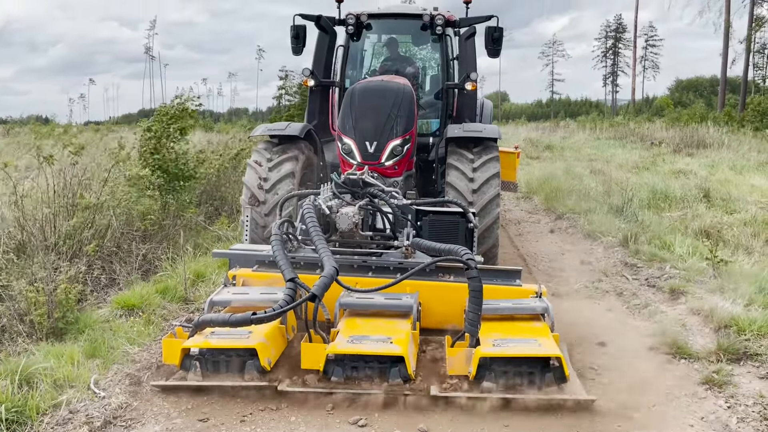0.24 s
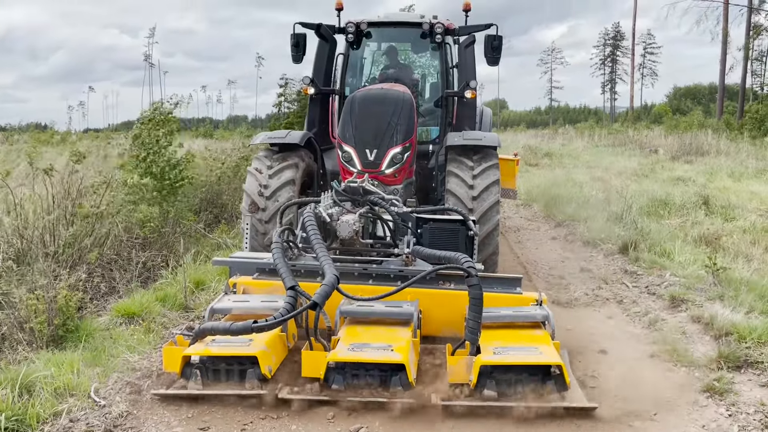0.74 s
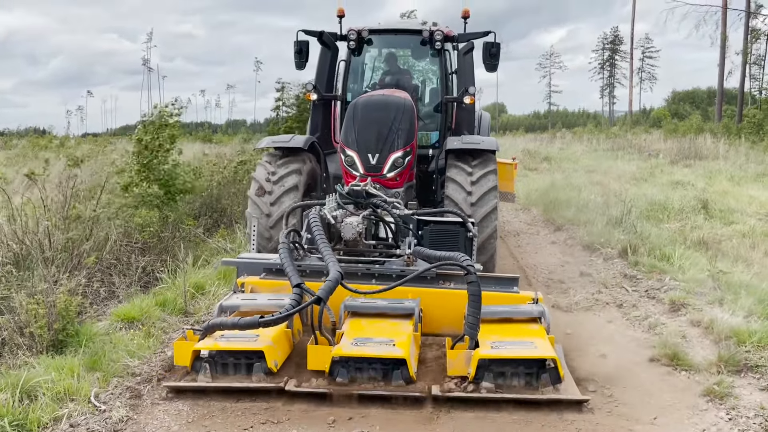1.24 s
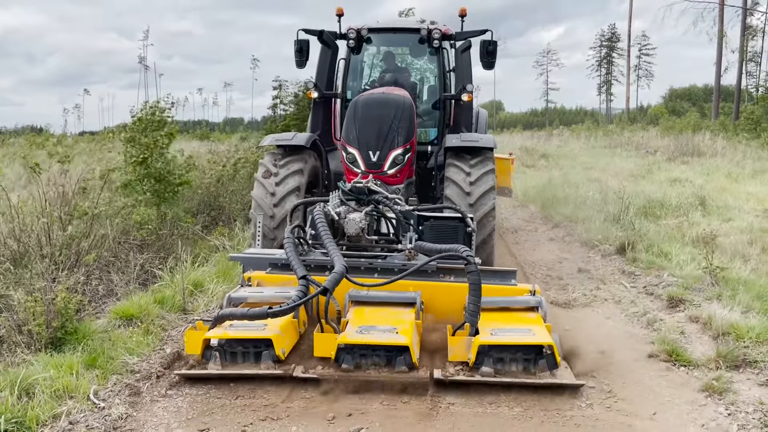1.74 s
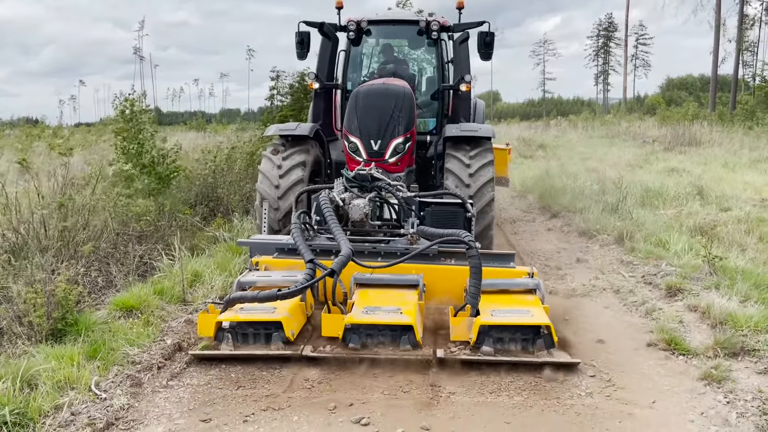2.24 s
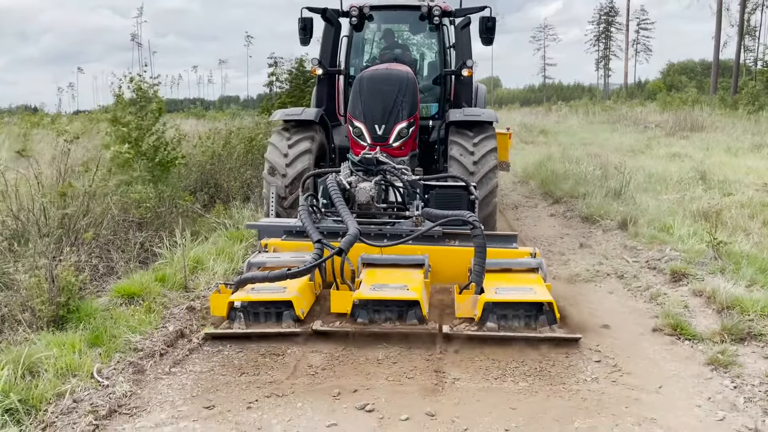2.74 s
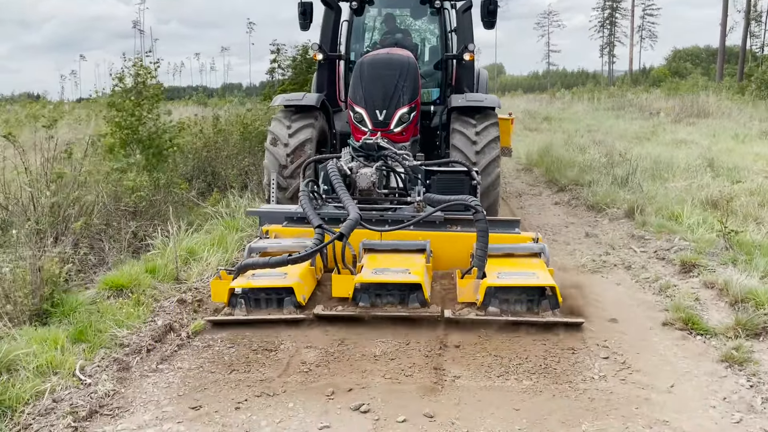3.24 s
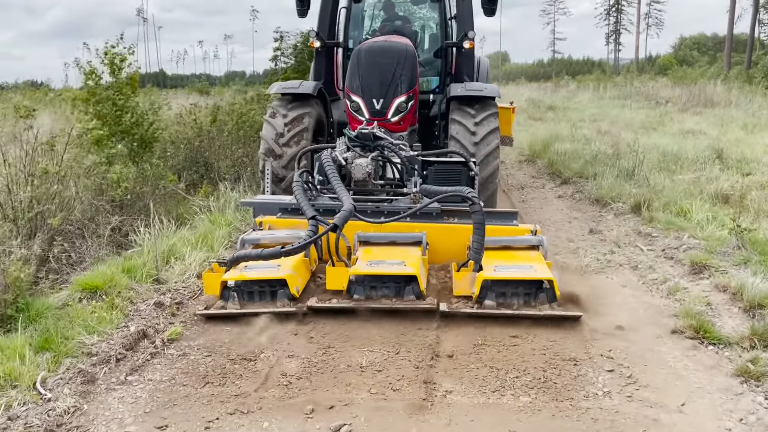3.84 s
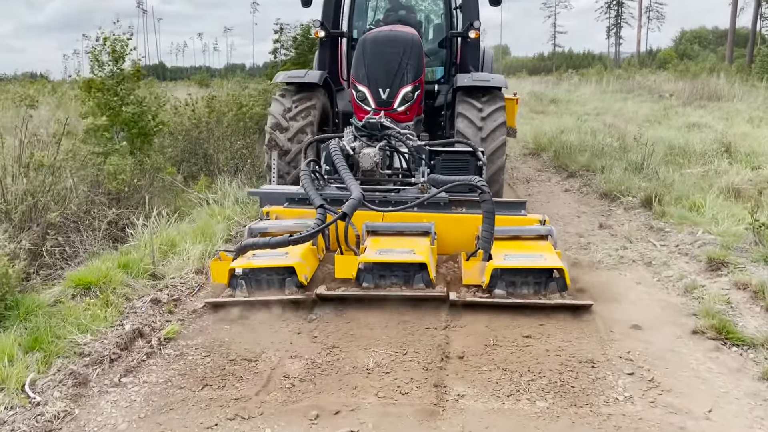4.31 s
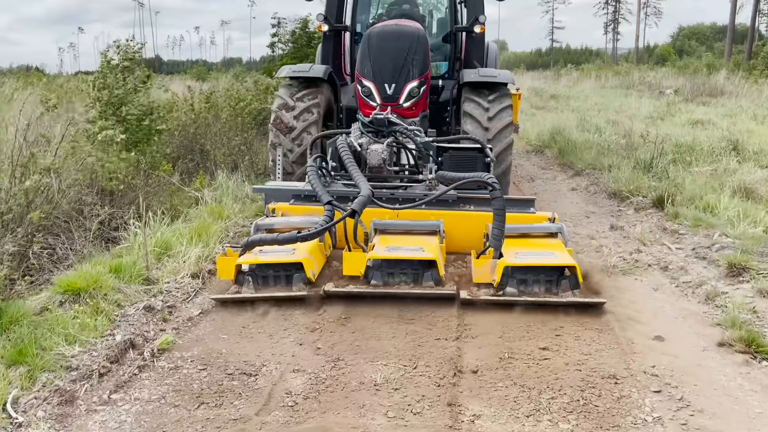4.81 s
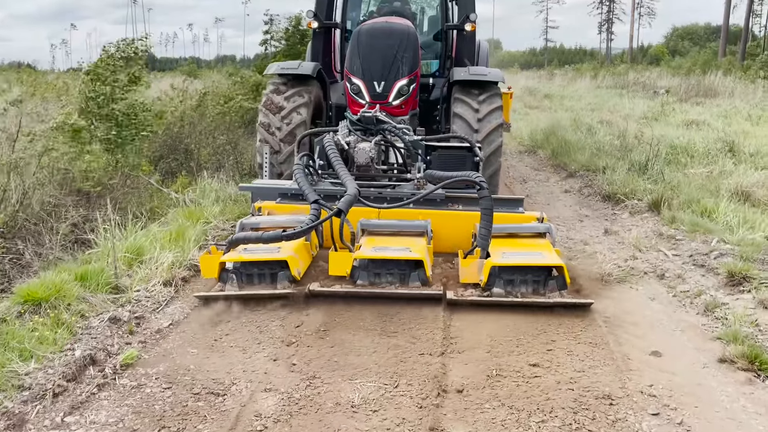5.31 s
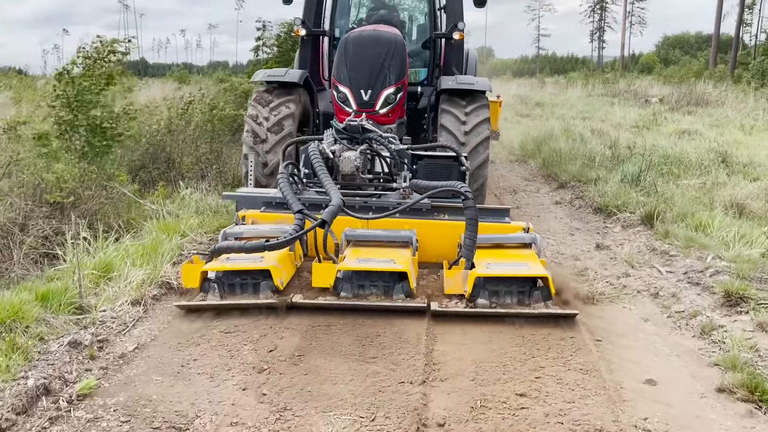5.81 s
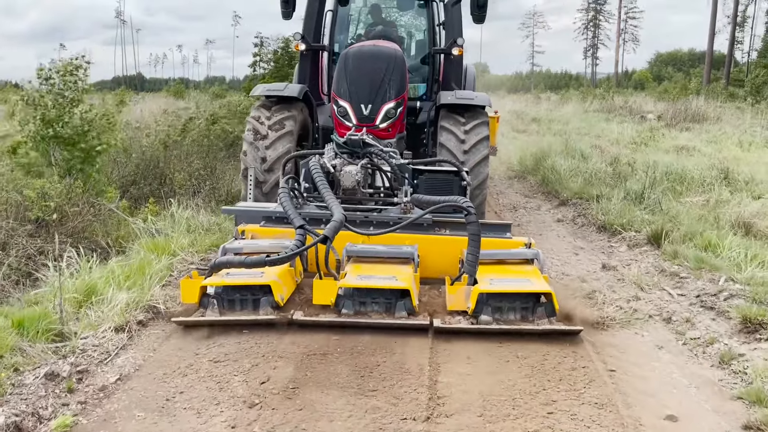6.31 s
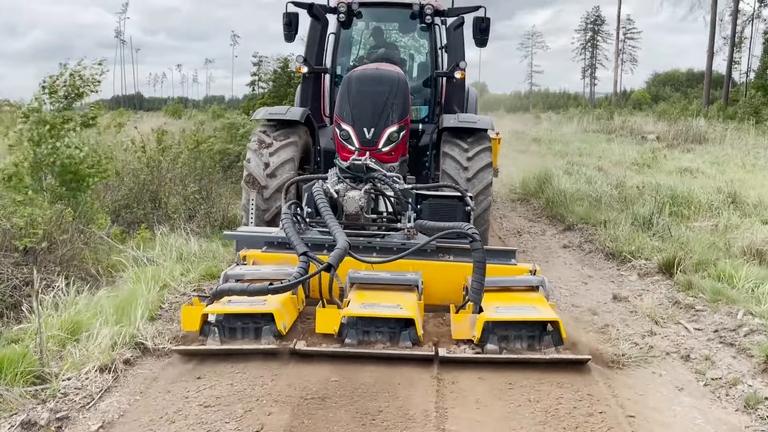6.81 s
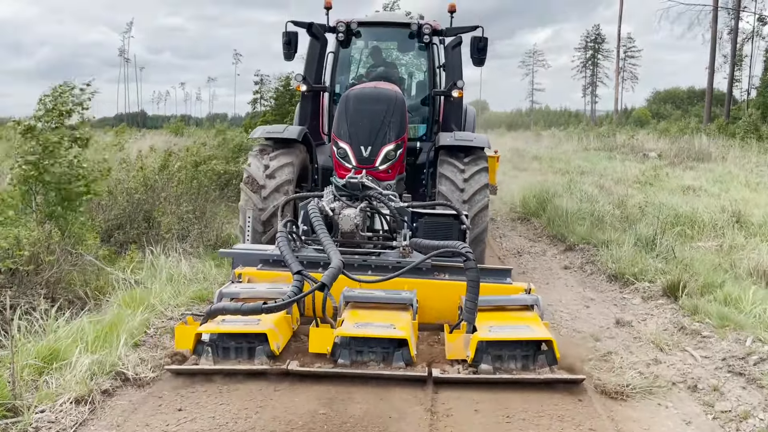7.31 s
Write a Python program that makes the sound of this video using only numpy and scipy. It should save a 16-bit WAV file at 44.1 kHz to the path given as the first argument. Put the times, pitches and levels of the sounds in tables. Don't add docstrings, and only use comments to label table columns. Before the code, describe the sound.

For about 7.5 seconds, a tractor's vibrating plates shake on gravel outdoors, heard from a few metres on a handheld phone. A deep hum around 48 Hz beats as the plate groups drift in and out of step, swelling near 1.5, 3, and 7 seconds and thinning around 3.5 and 5.6. Steel roars and stones chatter rapidly with each turn. From 0 to 1 second it is roughest: sprays of stones, scrapes, knocks, and ringing clanks. Faint high squeaks come at 1.1 to 1.8 and 2.8. At 3.65 a hard stone blow cracks, with a flurry of wind pops and short chirps until 4. A low thud lands at 5.2, a dull knock at 6, light knocks near 7. Wavering pump, motor and gear whines persist, a faint whistle joining around 6.7 to 7.3. Wind rumbles, flutters and thumps unevenly throughout, easing briefly near 4 and 5.5.

```python
import sys
import numpy as np
from scipy import signal
from scipy.fft import rfft, irfft, next_fast_len
from scipy.io import wavfile
from scipy.ndimage import uniform_filter1d

SR = 44100
rng = np.random.default_rng(int(sys.argv[2]) if len(sys.argv) > 2 else 0)


def transcribe(u):
    v = np.clip(np.atleast_2d(u).T, -1, 1)
    q = np.round(v * 32767).astype(np.int16)
    wavfile.write(sys.argv[1], SR, q)


def volts_from_db(level):
    exponent = np.asarray(level, float) / 20
    return 10 ** exponent


N = 333043
T = np.arange(N) / SR

SHAFT_HZ, MOTOR_HZ = 47.58, 261.0

# t/s, force/dB, lag/deg
BEAT = [(0, -17, 200), (.55, -5.5, 150), (.95, -5.5, 124), (1.38, -3, 52), (1.7, 0, 133), (2.15, -2, 204),
        (2.45, -10, 135), (2.95, 0.5, 154), (3.25, 2.5, 150), (3.55, -16.5, 170), (4.15, -3.5, 177),
        (4.58, -10, 200), (4.72, -9.5, 227), (5.08, -4, 170), (5.6, -25, 110), (6.52, -0.5, 85),
        (7.05, 1.5, 104), (7.4, -5, 36)]
# multiple, level/dB
IN_STEP_ORDERS = [(1, -10.5), (2, -10.5), (3, -18)]
# multiple, level/dB
UPPER_ORDERS = [(2.5, -35.5), (3.5, -42), (4, -36), (5, -36.5), (7, -45.5), (8, -52), (13, -44.5)]
# multiple, level over the rocking/dB
ROCKING_ORDERS = [(6, -0.5), (11, -8.5)]
# t/s, level/dB
ROCKING_DB = [(0, -26.5), (.7, -21), (1.5, -29), (2.0, -25), (2.5, -37), (4.5, -58), (5.0, -29), (5.4, -43),
              (5.7, -25), (6.3, -35), (7.1, -24.5), (7.55, -29)]

# t/s, level/dB
BITE_DB = [(0, 6.5), (.55, 3), (.8, -0.5), (1, -0.5), (1.83, -1.5), (2.6, -2.5), (3.3, 0), (3.85, 1.5),
           (4.04, -1.5), (5.05, 1), (5.42, -0.5), (6.25, 1.5), (7.17, 1.5), (7.55, 0.5)]
# f/Hz, level/dB
ROAR_SPECTRUM = [(60, -21), (150, -2), (300, 3), (500, 2.5), (800, -2.5), (1000, -10.5), (1600, -9),
                 (2200, -14), (4000, -22.5), (8000, -40.5)]
# f/Hz, level/dB
CHATTER_SPECTRUM = [(300, -79), (1000, 2.5), (2100, 1), (3200, -6), (4700, -9), (6300, -11.5), (8000, -15),
                    (10000, -19), (13000, -30), (16000, -28)]
# f/Hz, width/Hz, lift/dB
FRAME_RINGS = [(275, 54, 3), (367, 215, -8), (769, 11, 5), (1290, 300, 2), (1391, 66, -6),
               (1550, 200, -0.5), (1870, 480, -1.5), (2074, 80, 3), (2450, 130, -2.5), (3174, 31, 4),
               (4650, 77, 2.5)]
# t/s, level over the chatter/dB, t60/s
SPATTERS = [(.205, -19, 0.075), (.325, 1.5, 0.19), (.37, -7, 0.092), (.438, 5, 0.12), (0.549, -1, 0.19),
            (0.629, 4.5, 0.13), (.825, 4, 0.03), (.083, 0, 0.046), (.168, -13, .04), (.253, -12, 0.035),
            (.417, -7, .04), (.507, 0, .04), (.74, -6, .03), (.783, -3, .03), (.866, -6, .03),
            (.912, -11, .03), (0.932, -3, .03), (1.19, 3, 0.033), (2.962, -6, 0.032), (3.323, -16, 0.028),
            (3.341, -13, 0.028), (4.763, -8, 0.028), (5.311, -2, .03), (5.456, -7, 0.036), (5.562, -6, .03),
            (7.339, 2, .03), (7.487, -3, .03), (2.69, -16, 0.044), (3.9, -7, .08), (6.12, -19, .05),
            (6.855, -15, 0.047)]
# t/s, peak/dB, f/Hz
KNOCKS = [(0.014, -11, 1030), (0.065, -11, 563), (0.211, -8, 665), (0.292, -9, 848), (0.326, -14, 660),
          (0.446, -14, 1030), (0.57, -10, 830), (0.591, -13, 1040), (0.63, -10, 900), (0.748, -9, 573),
          (0.761, -5, 589), (0.792, -9, 570), (0.846, -15, 738), (0.869, -21, 686), (1.622, -16, 770),
          (1.954, -18, 776), (2.152, -16, 735), (2.313, -14, 744), (2.378, -15, 689), (2.692, -16, 589),
          (2.747, -17, 789), (2.778, -18, 757), (2.915, -18, 794), (3.053, -21, 680), (3.645, -5, 604),
          (4.579, -13, 791), (4.656, -15, 587), (4.81, -15, 689), (4.842, -17, 670), (6.006, -19, 627),
          (6.063, -20, 665), (6.169, -22, 721), (6.482, -18, 762), (6.856, -16, 738), (7.008, -13, 611),
          (7.046, -16, 794), (7.111, -13, 600),
          (3.659, -2, 740),
    (3.681, -13, 1050),
    (3.7085, -10, 1100),
    (5.1795, -6, 580),
    (5.981, -8, 680),
    (3.574, -8, 640),
    (.584, -16, 880),
    (.376, -13, 870),
]

# t/s, f/Hz
PUMP_HZ = [(0, 412), (7.55, 412)]
# multiple, level/dB
PUMP_ORDERS = [(2.5, -43), (3, -46), (4, -44.5), (10, -60)]
# t/s, level/dB
PUMP_FIFTH_DB = [(0, -45), (.4, -38), (.82, -51), (3.5, -47), (3.76, -37), (4.2, -46), (4.7, -52),
                 (5.1, -44), (5.3, -42), (6.3, -49), (6.62, -49), (7.32, -38), (7.55, -46)]
# t/s, f/Hz
FAN_HZ = [(0, 424), (2.5, 420), (4.5, 412), (7.55, 408)]
# multiple, level/dB
FAN_ORDERS = [(1, -38.5)]
# multiple, level/dB
MOTOR_ORDERS = [(1, -37), (3, -38.5)]
# multiple, level/dB
MOTOR_CLEAN_ORDERS = [(11, -52.5)]
# t/s, level/dB
MOTOR_SIXTH_DB = [(0, -55), (.53, -30), (.7, -43.5), (2.5, -55), (2.8, -40.5), (7.55, -43)]
# t/s, level/dB
MOTOR_TWELFTH_DB = [(0, -59), (1.2, -47), (2, -49), (2.7, -44), (3.3, -51), (4.1, -45), (5.2, -52),
                    (6, -47.5), (7.55, -56)]
# t/s, f/Hz
GEAR_HZ = [(0, 2130), (2.4, 2128), (2.8, 2146), (7.55, 2142)]
# t/s, level/dB
GEAR_DB = [(1.6, -70.5), (2, -43), (3, -41.5), (7.55, -44.5)]
# t/s, f/Hz
VALVE_HZ = [(0, 2470), (.6, 2478), (.9, 2450), (1.3, 2490), (2, 2460), (3, 2478), (7.55, 2470)]
# t/s, level/dB
VALVE_DB = [(0, -39), (.6, -40), (.8, -45), (1.3, -39), (1.7, -50), (3.8, -48), (4, -42), (4.6, -44),
            (4.8, -58), (5.1, -45), (6.2, -46), (6.5, -43), (7, -51)]
# t/s, f/Hz
HOSE_HZ = [(0, 2680), (7.55, 2680)]
# t/s, level/dB
HOSE_DB = [(6.5, -70), (6.7, -41), (7.25, -42), (7.4, -70)]

# t/s, peak/dB, f/Hz, t60/s
CLANKS = [(.012, -12.5, 1013, 0.078), (.255, -38, 3180, .08), (.37, -21, 1466, 0.11),
          (.41, -18.5, 1687, 0.13), (.414, -15.5, 3325, 0.066), (0.7, -14, 387.6, 1), (.2, -6, 394, 0.21),
          (.75, -20, 600, 0.48), (1.11, -21.5, 514, 0.62), (0.58, -25, 540, .3), (.8, -18, 465, 0.24)]
# t/s, level/dB rms, f/Hz, length/s
SQUEAKS = [(1.14, -40.5, 4500, 0.23), (1.33, -44, 4560, 0.14), (1.438, -41, 4540, 0.36),
           (2.802, -42, 4560, 0.24), (3.59, -42, 4540, 0.062), (3.675, -35, 4650, 0.04),
           (3.711, -28.5, 4650, 0.039), (3.757, -30, 4650, 0.032), (3.803, -31, 4650, .025),
           (3.846, -36, 4700, 0.023), (3.893, -49, 4550, 0.0201), (3.926, -32, 4650, 0.023),
           (3.96, -32, 4650, 0.021), (4.057, -37, 4605, .015)]
# t/s, level/dB rms, f/Hz, length/s
SCRAPES = [(.295, -30, 2060, .04), (.32, -28, 2070, .02), (.335, -29, 2370, .06), (.442, -26, 2400, .025),
           (.43, -30, 2540, .02), (.505, -26, 2030, .075), (.53, -31, 2450, .07), (.625, -34, 3220, .02),
           (.62, -27, 2060, .055), (.87, -30, 2270, .045), (.92, -31, 2200, .04), (.945, -31, 2330, .04)]

# t/s, strength/dB, flutter at the port edge over it/dB
WIND = [(0, -30.5, 20.5), (.1, -22, 8.5), (.35, -31.5, 22), (.6, -21.5, 9.5), (.9, -17.5, 2),
        (1.1, -21.5, 0), (2.1, -21, 3.5), (2.45, -28.5, 5.5), (2.8, -19.5, 2), (3.5, -17, -7.5),
        (3.8, -20, -2), (3.95, -32, -3), (4.5, -24, -2.5), (5.1, -20, -2.5), (5.5, -33, 1),
        (6.2, -21.5, -12.5), (6.6, -20.5, -4), (7.55, -15, -13)]
# t/s, deep lift/dB, flutter lift/dB
GUSTS = [(.67, 0, 4.5), (.74, -4, 1.5), (.5, -2, -4), (.81, -7, 0.5), (.88, 2, 3), (.94, 2, 2),
         (1.05, 3, -1), (1.15, 1, 1.5), (1.22, 2.5, 6.5), (1.3, -2, 3.5), (1.45, 3, -1.5), (1.6, 2, 2),
         (1.75, -4, -5), (1.95, 1, -3), (2.08, 2, -2.5), (2.21, 7.5, 1), (2.6, -1, 1), (2.68, -1, -6),
         (2.78, 4, -3), (2.9, -10, -1), (3.05, 2.5, -8), (3.2, -7, 2), (3.36, -1, -1), (3.46, -2, 9.5),
         (3.59, 4.5, 3), (3.65, 2, 7), (3.71, 4.5, 8), (3.79, -2, 4), (3.85, 3, 5), (4.08, 11.5, 1),
         (4.66, 0.5, 3.5), (4.76, -6, 7), (4.9, -10, 4), (5.17, -1, 9), (5.78, 1, 8), (6.04, 0.5, 14),
         (6.14, 0, -5), (6.3, 0, 6), (6.38, 1, -8), (6.471, 0, 8), (6.58, -3, 6.5), (6.72, -1, 5),
         (7.0, -0.5, 0), (7.25, -10, 11.5), (7.4, -3, 11)]
# f/Hz, level/dB
BUFFET_SPECTRUM = [(15, -34), (30, -15), (45, 3.5), (70, 10.5), (110, 2), (160, -4), (250, -22.5),
                   (500, -67)]
# f/Hz, level/dB
FLUTTER_SPECTRUM = [(60, -37), (120, -4), (180, 4), (300, -3.5), (450, -10.5), (900, -11), (1500, -55)]
# t/s, peak/dB, pan/dB, starting pitch above the resting one/Hz
POPS = [(0.12, -18, 8, 620), (0.162, -9, 1, 400), (2.359, -15, 0, 624), (2.692, -13, 4, 910),
        (2.756, -14, 2, 497), (3.515, -26, -0.5, 620), (3.573, -3, 6, 570), (3.64, -19, 2, 620),
        (3.65, -9, -8, 450), (3.664, -20, 10, 200), (3.674, -10, -9, 495), (3.682, -10.5, 14, 1110),
        (3.695, -5, -2, 300), (3.717, -15, 0, 600), (3.745, -17, 0, 300), (3.76, -23, 0, 695),
        (3.708, -13.5, 10, 1500), (3.729, -9, 6, 504), (4.095, -14, 4, 496), (4.8, -13.5, 6, 620),
        (5.174, -10, -3, 120), (5.18, -8, 8, 250), (5.195, -17, 0, 400), (5.236, -17, 0, 400),
        (5.387, -20, 0, 300), (5.983, -17, 0, 300), (6.051, -15, -4, 490), (6.08, -15, 2, 397),
        (6.458, -14, -9, 400), (6.522, -24, -3, 620)]
# t/s, peak/dB, f/Hz
THUMPS = [(.017, -16, 183), (0.208, -13, 97), (.24, -9, 180), (0.3, -6, 182), (.495, -2, 98),
          (.669, -4, 144), (1.03, -1, 81.4), (1.117, -4.5, 108), (1.195, -10, 62.4), (2.26, -9, 120),
          (2.476, -6.5, 91.5), (2.694, -8, 100), (2.753, -2, 125), (2.86, -5, 100), (2.966, -9, 91.5),
          (3.42, -7, 190), (3.471, -10, 190), (3.554, -6, 150), (3.683, -3, 125), (3.645, -6, 100),
          (3.71, -1, 91), (3.74, -8, 90), (3.802, -1, 93), (4.014, -14, 91.5), (4.265, -7.5, 91.5),
          (4.481, -14, 87), (4.89, -6, 88), (5.017, -8, 89), (5.776, -15, 75), (6.002, -7, 147),
          (6.429, -7, 74), (6.575, -6, 230), (6.63, -8.5, 144), (6.818, -10, 81), (7.25, -12, 190),
          (7.475, -5, 100)]

# f/Hz, left lead/rad
PORT_LEAD = [(0, 0), (1460, -.1), (2500, .6), (3960, .2), (5250, .6), (6890, -1.3), (7670, -3),
             (8870, -3.3), (10200, -5.1), (11500, -6.3), (12500, -7.4), (14000, -9.4), (16000, -9.4)]
# f/Hz, left minus right/dB
PORT_TILT = [(60, -0.5), (110, 1), (200, 1.5), (370, 0), (670, 2), (1220, -3.5), (2220, -0.5), (4060, 5),
             (7420, 1.5), (13500, -0.5)]
# f/Hz, correlation/1
PORT_LIKENESS = [(60, 0.84), (130, 0.43), (280, 0.12), (610, 0.78), (1330, 0.78), (2880, 0.69),
                 (6240, 0.95), (13500, 0.2)]
# 0 mid or 1 side, from f/Hz, to f/Hz, edge step/Hz, share of frames stepped/1
STARVED_BANDS = [
    (0, 7650, 8950, 350, .14),
    (0, 13780, 22050, 350, .12),
    (1, 10350, 12400, 600, .14),
    (1, 12400, 12900, 500, .65),
]
FULL_FRAMES_S = [.575, 2.23, 3.715, 6.125]


def evened(x):
    return x / np.sqrt(np.mean(x ** 2) + 1e-20)


def read(points, hz):
    f, value = np.transpose(points)
    return np.interp(np.log(hz + 1), np.log(f + 1), value)


def curves(rows):
    s, *columns = np.transpose(rows)
    return [np.interp(T, s, c) for c in columns]


def add(mix, s, sound):
    part = mix[..., round(s * SR):][..., :sound.shape[-1]]
    part += sound[..., :part.shape[-1]]


def coloured(x, points, rings=()):
    size = next_fast_len(N)
    hz = np.fft.rfftfreq(size, 1 / SR)
    db = read(points, hz)
    for f, width_hz, lift_db in rings:
        db = db + lift_db / (1 + (2 * (hz - f) / width_hz) ** 2)
    return evened(irfft(rfft(x, size) * volts_from_db(db), size)[..., :N])


def drift(rate_hz, through=np.asarray, depth=1):
    t = T[::256]
    rates_hz = rate_hz * np.geomspace(.08, 1, 12)
    slow = sum(np.sin(2 * np.pi * (f * t + rng.random())) / f ** 0.31 for f in rates_hz)
    return np.interp(T, t, through(depth * evened(slow)))


def tones(hz, orders, waver_db, rate_hz, fuzz_rad):
    half_turn = np.pi * np.cumsum(hz) / SR
    out = np.zeros(N)
    for k, db in orders:
        level = np.sqrt(2) * volts_from_db(db) * drift(rate_hz, volts_from_db, waver_db)
        phase = drift(rate_hz, depth=fuzz_rad) + 6 * rng.random()
        out += level * np.cos(round(2 * k) * half_turn + phase)
    return out


def plates():
    left_over = 0.16
    second_slam_db = 1.5
    force_db, lag_deg = curves(BEAT)
    lag = np.radians(lag_deg)
    hz = np.full(N, SHAFT_HZ)
    low = [(k, db + force_db + 10 * np.log10(np.cos(k * lag / 2) ** 2 + left_over ** 2))
           for k, db in IN_STEP_ORDERS]
    rocking_db = curves(ROCKING_DB)[0]
    rocking = [(k, db + rocking_db) for k, db in ROCKING_ORDERS]
    slam = volts_from_db(second_slam_db * np.cos(np.pi * SHAFT_HZ * T + 2 * lag))
    out = tones(hz, low, 1.6, 24, 0.3) * slam
    out += tones(hz, rocking, 2.6, 11, 1.23)
    return out + tones(hz, UPPER_ORDERS, 5.2, 4, 1.0)


def spatter():
    gain, t = np.ones(N), T[:SR // 4]
    for s, db, t60 in SPATTERS:
        add(gain, s, volts_from_db(db - 60 * t / t60))
    return gain


def shaking():
    roar_db, chatter_db, chatter_share = -25, -30, 0.53
    bite_db = curves(BITE_DB)[0]
    turn = 2 * np.pi * SHAFT_HZ * T + 1.2 * drift(1.5)
    slam_db = 1.3 * np.cos(turn) + 0.59 * np.cos(turn / 2) + 0.64 * np.cos(2 * turn + 0.93)
    slam_db += 0.32 * drift(14)
    size = volts_from_db(3.4 * np.minimum(rng.exponential(1, (2, N)), 5))
    hit = rng.random((2, N)) < 1500 * volts_from_db(2.5 * slam_db) / SR
    stones = 0.37 * evened(size * hit * rng.choice([-1, 1], (2, N)))
    stones += rng.standard_normal((2, N)) * volts_from_db(slam_db)
    roar = rng.standard_normal((2, N)) * volts_from_db(0.13 * slam_db + 1.3 * drift(20))
    roar = volts_from_db(roar_db + bite_db) * coloured(roar, ROAR_SPECTRUM, FRAME_RINGS)
    chatter = coloured(stones, CHATTER_SPECTRUM, FRAME_RINGS)
    return roar + volts_from_db(chatter_db + chatter_share * bite_db) * spatter() * chatter


def knocks():
    level_db, t60_s, bend, upper_db = -4, 0.036, 0.51, -8.5
    out, t = np.zeros(N), T[:1500]
    for s, db, hz in KNOCKS:
        turn = 2 * np.pi * np.cumsum(hz * (1 + bend * np.exp(-t / 0.0017))) / SR
        ring = np.sin(turn) + volts_from_db(upper_db) * np.sin(1.7 * turn)
        add(out, s, volts_from_db(db + level_db - 60 * t / t60_s) * ring * np.minimum(t / .0008, 1))
    return out


def whines():
    throb_hz, throb_peak_s, throb_db = 1.623, 3.88, 5.5
    throb = throb_db * np.cos(2 * np.pi * throb_hz * (T - throb_peak_s))
    sixth = [(6, curves(MOTOR_SIXTH_DB)[0] + throb)]
    twelfth = [(12, *curves(MOTOR_TWELFTH_DB))]
    fifth = [(5, *curves(PUMP_FIFTH_DB))]
    motor_hz = np.full(N, MOTOR_HZ)
    out = tones(motor_hz, sixth, 2.8, 30, 1.1)
    out += tones(motor_hz, MOTOR_ORDERS, 2.7, 20, 1.17)
    out += tones(motor_hz, twelfth + MOTOR_CLEAN_ORDERS, 2.6, 16, .9)
    out += tones(*curves(PUMP_HZ), PUMP_ORDERS + fifth, 2.8, 14, 0.75)
    out += tones(*curves(FAN_HZ), FAN_ORDERS, 5.3, 5, 0.98)
    singles = [(GEAR_HZ, GEAR_DB, 10, 1.1), (VALVE_HZ, VALVE_DB, 6, .7), (HOSE_HZ, HOSE_DB, 30, 1.6)]
    for pitch, level, rate_hz, fuzz_rad in singles:
        out += tones(*curves(pitch), [(1, *curves(level))], 2.2, rate_hz, fuzz_rad)
    return out


def clanks():
    out, t = np.zeros(N), T[:SR // 2]
    for s, db, hz, t60 in CLANKS:
        detune = rng.uniform(0.0056, 0.032)
        pair = np.sin(2 * np.pi * hz * t) + 0.31 * np.sin(2 * np.pi * hz * (1 + detune) * t)
        rough = 1 + 0.67 * evened(uniform_filter1d(rng.standard_normal(len(t)), 300))
        add(out, s, volts_from_db(db - 60 * t / t60) * pair * rough * np.minimum(t / 0.0011, 1))
    return out


def rubbing():
    out = np.zeros(N)
    for s, db, hz, length in SQUEAKS + SCRAPES:
        u = T[T < length]
        slip = evened(uniform_filter1d(rng.standard_normal(len(u)), 120))
        wobble = (0.0087 + 1.5e-6 * hz) * slip * min(0.057 / length, 1) ** 0.35
        turn = 2 * np.pi * np.cumsum(hz * (1.004 - 0.0012 * u / length + wobble)) / SR
        rub = np.cos(turn) + volts_from_db(-9.0) * (hz / 4600) ** 3 * np.cos(2 * turn) + volts_from_db(-31) * np.cos(3 * turn)
        rough = 1 + (0.32 + 0.4 * (hz < 4000)) * np.roll(slip, 200)
        rocked = 1 + 0.22 * np.cos(np.pi * SHAFT_HZ * u * (length > .1))
        add(out, s, volts_from_db(db) * rub * rough * rocked * signal.windows.tukey(len(u), .4))
    return out


def wind():
    gust_s, lump_db = 0.036, 0.96
    deep_db, edge_db = curves(WIND)
    lifts = sum(np.outer(lifts_db, np.exp(-((T[::64] - s) / gust_s) ** 2)) for s, *lifts_db in GUSTS)
    deep_lift_db, edge_lift_db = lifts.repeat(64, axis=1)[:, :N]
    edge_db = deep_db + edge_db + edge_lift_db
    deep_db = deep_db + deep_lift_db + lump_db * drift(8)
    deep = coloured(rng.standard_normal((2, N)), BUFFET_SPECTRUM) * volts_from_db(deep_db + 4.0)
    edge = coloured(rng.standard_normal((2, N)), FLUTTER_SPECTRUM)
    edge = edge * volts_from_db(edge_db - 4.0 + 1.75 * drift(30))
    return deep[0] + edge[0] + np.outer([1, -1], 0.27 * deep[1] + 0.25 * edge[1])


def pops():
    rest_hz, fall_s, t60_s = 220, 0.00419, 0.066
    out, t = np.zeros((2, N)), T[:2000]
    for s, db, pan_db, jump_hz in POPS:
        hz = rest_hz + jump_hz * np.exp(-t / fall_s)
        puff = np.convolve(rng.standard_normal(len(t)), np.hanning(44) / 22, "same")
        pop = np.sin(2 * np.pi * np.cumsum(hz) / SR) + 0.87 * puff
        level_db = db + 1.0 - 60 * t / t60_s + np.outer([.5, -.5], pan_db)
        add(out, s, volts_from_db(level_db) * pop * np.minimum(t / 0.002, 1))
    return out


def thumps():
    level_db, turns, sag = -3.5, 2.9, 0.28
    out = np.zeros(N)
    for s, db, hz in THUMPS:
        u = np.arange(0, 1, hz / turns / SR)
        push = np.sin(2 * np.pi * turns * u * (1 + sag * (1 - u)))
        add(out, s, volts_from_db(db + level_db) * np.sin(np.pi * u ** 0.75) * push)
    return out


def ports(shared, other):
    size = next_fast_len(N)
    hz = np.fft.rfftfreq(size, 1 / SR)
    a, b = rfft(shared, size), rfft(other, size)
    apart = np.arccos(np.clip(read(PORT_LIKENESS, hz), -1, 1)) / 2
    half = volts_from_db(read(PORT_TILT, hz) / 2) * np.exp(.5j * read(PORT_LEAD, hz))
    left = np.cos(apart) * a + np.sin(apart) * b
    right = np.cos(apart) * a - np.sin(apart) * b
    return irfft(np.array([left * half, right / half]), size)[:, :N]


def starved(x):
    mid_side = np.array([x[0] + x[1], x[0] - x[1]]) / 2
    hz, t, z = signal.stft(mid_side, SR, nperseg=1024)
    hz = hz[:, None]
    full = (abs(t[:, None] - FULL_FRAMES_S) < 600 / SR).any(1)
    for channel, low_hz, high_hz, step_hz, share in STARVED_BANDS:
        stepped = np.repeat(rng.random((2, len(t))) < share, 2, axis=1)[:, :len(t)] * step_hz
        z[channel] *= (hz < low_hz + stepped[0]) | (hz > high_hz - stepped[1]) | full
    mid, side = signal.istft(z, SR, nperseg=1024)[1][:, :N]
    return np.array([mid + side, mid - side])


def scene():
    noise = shaking()
    machine = plates() + noise[0] + knocks() + whines() + clanks() + rubbing()
    return ports(machine, noise[1]) + wind() + pops() + thumps()


def low_pass(x):
    return signal.sosfilt(signal.butter(12, 15830, fs=SR, output="sos"), x)


def record(dry):
    limited = 1.132 * np.tanh(dry / 1.213)
    mix = starved(limited)
    return low_pass(mix)


dry = scene()
out = record(dry)
transcribe(out)
```